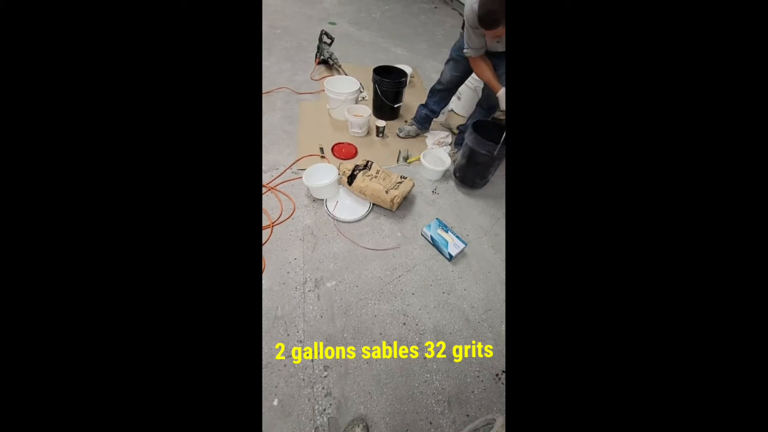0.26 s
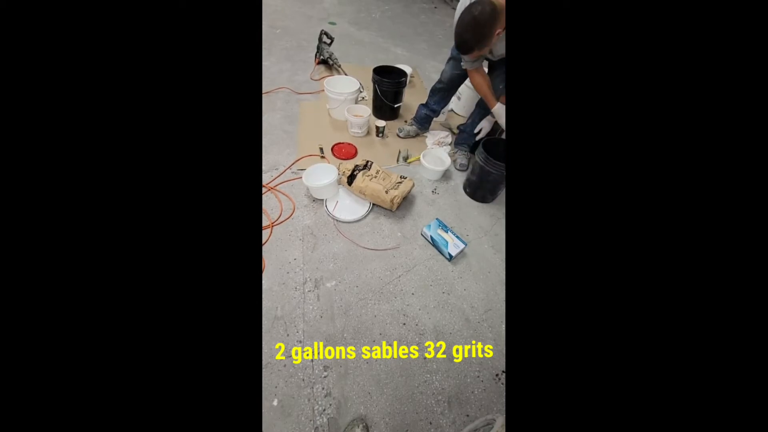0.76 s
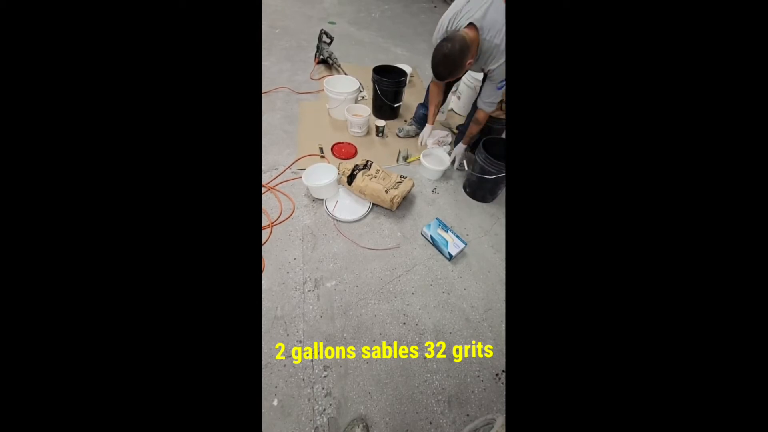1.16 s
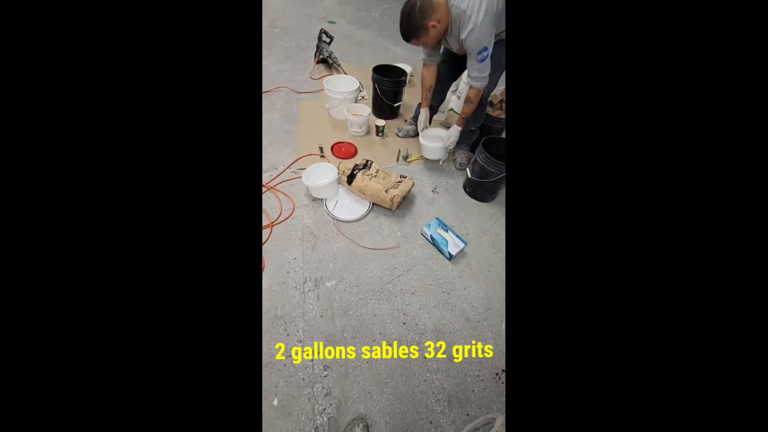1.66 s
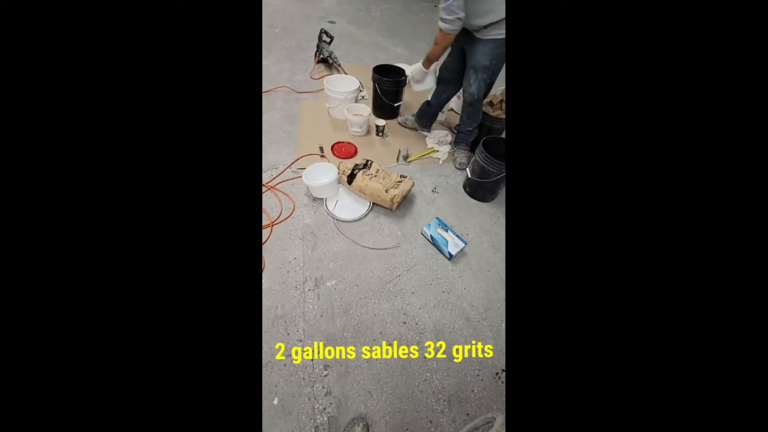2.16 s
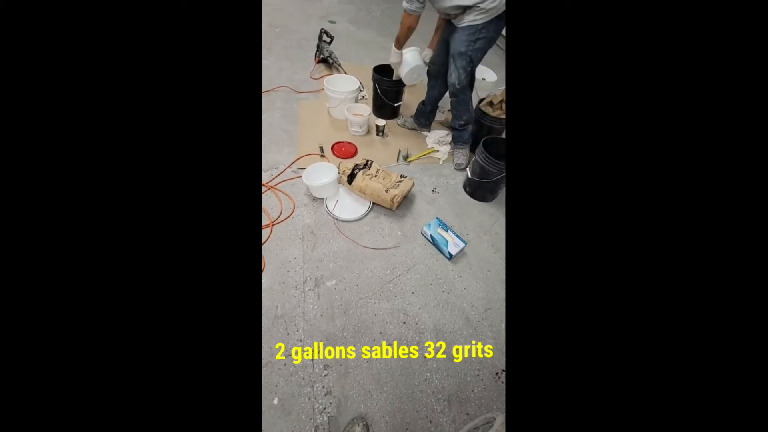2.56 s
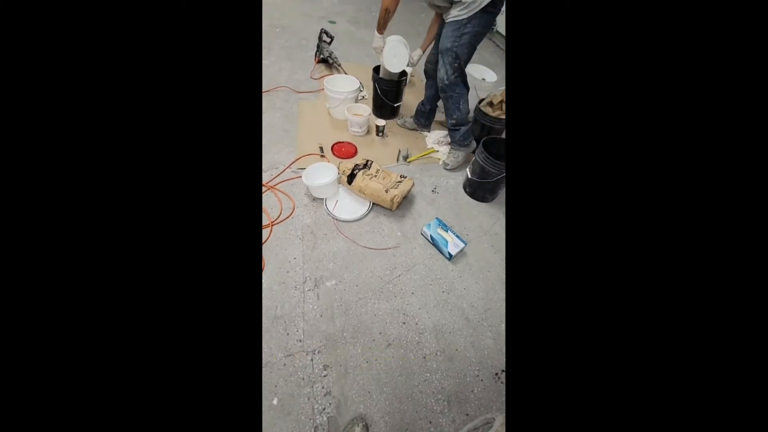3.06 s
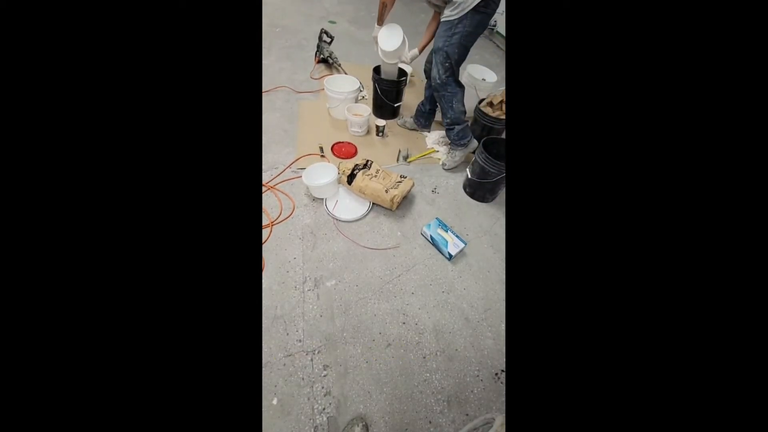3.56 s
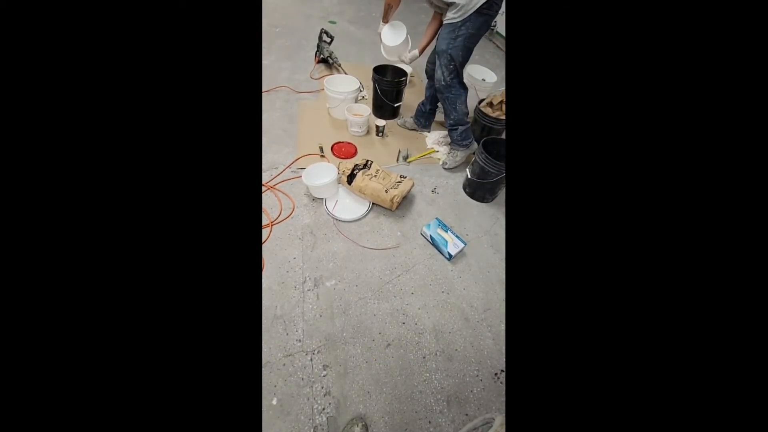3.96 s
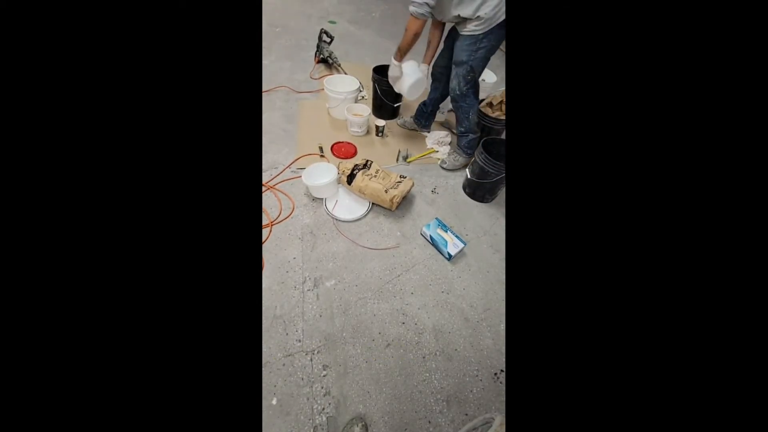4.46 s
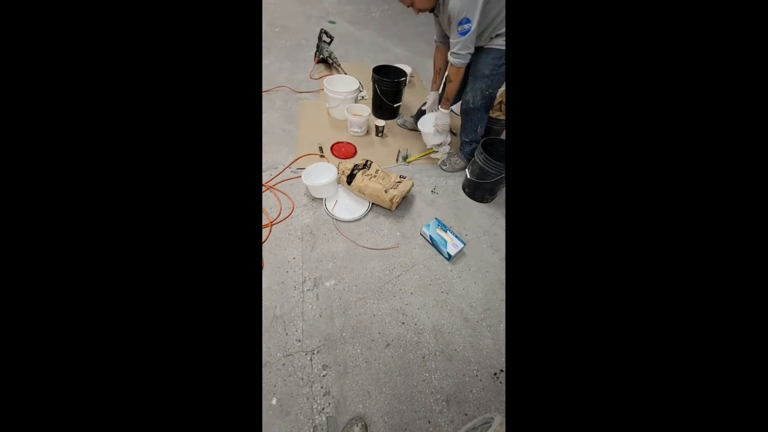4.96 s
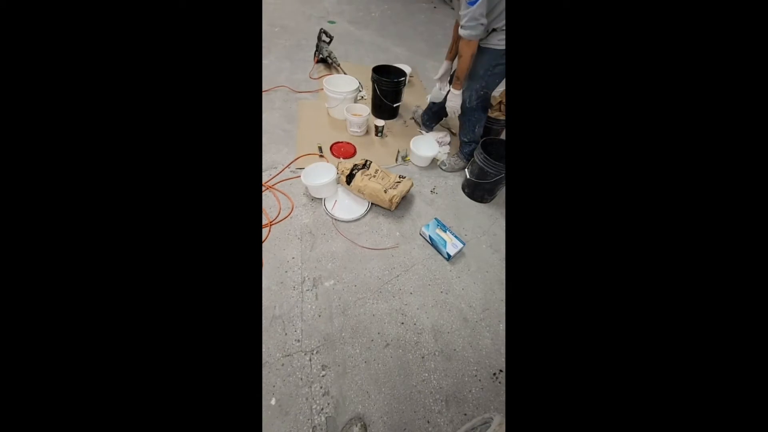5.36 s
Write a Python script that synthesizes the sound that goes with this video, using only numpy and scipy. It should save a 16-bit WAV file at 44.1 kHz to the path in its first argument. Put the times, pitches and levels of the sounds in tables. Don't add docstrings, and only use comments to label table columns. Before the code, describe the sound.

A full plastic bucket thumps down, its wire handle clacks, dry sand rushes into a deep bucket, then an empty pail bounces on concrete.

```python
import sys
import numpy as np
from scipy import signal
from scipy.fft import rfft, irfft
from scipy.io import wavfile
from scipy.ndimage import uniform_filter1d

SR = 44100
rng = np.random.default_rng(int(sys.argv[2]) if len(sys.argv) > 2 else 0)


def master(y):
    cut = np.clip(np.atleast_2d(y).T, -1, 1)
    pcm = np.round(cut * 32767)
    wavfile.write(sys.argv[1], SR, pcm.astype(np.int16))


def field_ratio(decibels):
    return 10 ** (np.asarray(decibels, dtype=float) / 20)


N = 247753

# (start [s], rise [s], length [s], flow level [dB], rush on the heap re flow [dB])
SAND_SLIDES = [
    (-.1, 0.3, 0.26, -52.5, -0.5),
    (1.9, 0.096, 0.19, -65, 2),
    (2.191, .08, 0.48, -72.5, 4.5),
    (2.495, 0.18, 0.44, -60.5, -6.5),
    (2.799, 0.079, 0.38, -48, 0),
    (3.15, .12, 0.77, -55.5, 2),
    (3.373, .13, 0.35, -49.5, 1.5),
    (3.897, 0.18, 0.27, -79.5, -0.5),
    (4.2, 0.14, 0.38, -90, 17.5),
]
# (start [s], rise [s], length [s], level [dB])
BARE_DRUMMING = [
    (2.6, 0.087, 0.16, -51.5),
    (2.78, 0.038, .07, -49.5),
    (2.86, 0.067, 0.11, -52),
    (3.4, 0.032, 0.064, -64),
    (3.78, 0.029, 0.036, -59),
]
# (start [s], rise [s], length [s], level [dB])
BUCKET_DRAGS = [
    (-.05, 0.094, .2, -62),
    (.14, 0.02, 0.067, -54.5),
    (4.0, 0.083, 0.15, -70),
    (4.7, 0.2, 0.29, -75.5),
]
# (frequency [Hz], density [dB per Hz])
FIZZ_SPECTRUM = [(3240, -32), (5500, -7), (6820, -8.5), (7900, -5), (10500, -6.5), (13300, 0.5),
                 (15200, -3), (16000, -19)]
# (frequency [Hz], density [dB per Hz])
RUSH_SPECTRUM = [(530, -51.5), (1000, -8.5), (1500, -9), (2000, -3), (3200, 1), (4500, -3.5), (5500, -10),
                 (7000, -9.5), (9100, -63.5)]
# (frequency [Hz], density [dB per Hz])
SCRAPE_SPECTRUM = [(600, -34), (1000, -4), (1500, 1), (2100, -7), (3200, -34.5)]
# (frequency [Hz], width [Hz], level [dB])
BUCKET_AIR = [(725, 80, 1.5), (620, 500, -19), (1280, 200, -15)]

# (time [s], blow [dB], crack re blow [dB], contact softness [ms], direct ring re blow [dB])
BUCKET_KNOCKS = [
    (.564, -8, -14.5, 0.11, -6),
    (.62, -11, -36, 0.2, -11),
    (.675, -22.5, -36, 0.43, 11),
    (.722, -20.5, -21.5, 0.13, -4),
    (.808, -17.5, -27.5, 0.051, -11),
]
HANDLE_KNOCKS = [
    (.72, -37, 11, 0.022, -6),
    (.8235, -19, 8.5, 0.067, -1),
    (1.1412, -6.5, 8.5, 0.0059, -2),
    (1.4275, -12.5, 8, 0.011, -2),
    (1.5945, -20.5, 5.5, 0.054, -19),
    (1.68, -24, 1, 0.13, -8),
    (1.7215, -37, -11, 0.076, -11),
]
PAIL_KNOCKS = [
    (5.163, -14.5, 11, 0.03, -9),
    (5.255, -11.5, -27, 0.067, -2.5),
    (5.329, -36.5, 0, 0.069, 13),
    (5.384, -28, 2, 0.17, 4),
    (5.445, -30.5, -5, 0.13, -5),
    (5.525, -36, -8, 0.18, -11),
]
RIM_KNOCKS = [
    (2.589, -54.5, -16, 0.042, 8),
    (2.751, -59, -15, 0.025, 15),
    (5.131, -34, -18, 0.044, -23),
    (5.142, -19, -17.5, 0.053, -13),
    (5.152, -17.5, -1.5, 0.017, 0.5),
]
FLOOR_THUDS = [
    (0.17, -25, -34, 0.024, -17),
    (0.813, -16, -7, 0.39, 4.5),
    (2.274, -35, -11, 0.11, -2),
]
GRIT_TICKS = [
    (1.9334, -46, 11, 0.046, 6),
    (2.8216, -40.5, -6, .08, 2),
    (4.049, -55, 12, .03, 2.3),
    (4.0694, -56, 16, 0.019, 2.2),
    (4.165, -48.5, 12.5, 0.045, 4),
    (4.2222, -47, 6.5, 0.022, 4),
    (4.344, -44.5, 1, 0.049, 2),
    (4.6682, -68, -7.5, 0.028, 3),
]
# (frequency [Hz], level [dB], decay time t60 [s])
BUCKET_MODES = [(112, -11.5, 0.055), (199.6, -4.5, 0.13), (245.8, -1, .11), (306.6, -6, 0.086),
                (429.4, -1.5, 0.018), (617, -3.5, 0.015), (780, -4, 0.013), (1093, -3.5, 0.027),
                (1490, -4, 0.0084), (2080, -8.5, 0.004)]
HANDLE_MODES = [(171, -16, 0.019), (245, -21, 0.053), (397, -9, 0.0097), (621, -5.5, 0.0079),
                (1025, -5.5, 0.013), (1293, -2, 0.0096), (2010, 3.5, 0.0019), (2560, -5, 0.0084),
                (2930, -2, 0.011), (2935, -7, 0.019), (2970, -15, 0.014)]
PAIL_MODES = [(109.5, -6.5, 0.091), (202, -7.5, 0.037), (348.8, 1, 0.085), (507.3, -2, 0.13),
              (574, -1.5, 0.091), (735, 4.5, 0.023), (1098, 7, 0.0093), (1755, 1, 0.0096),
              (2300, -16, 0.0057)]
RIM_MODES = [(577, -10.5, 0.019), (1150, -8, 0.022), (2140, 1, 0.0054), (3420, -4.5, 0.0028)]
FLOOR_MODES = [(85, -12, 0.17), (213.4, 4, 0.017), (367, -1.5, 0.04), (573, 1.5, 0.016), (1190, -7, 0.0088),
               (2128, -8, .006)]
GRIT_MODES = [(754, -44, .02), (1274, -8, 0.082), (2510, -8, .004), (3640, 11.5, 0.0039),
              (4260, 7.5, 0.0022)]
# (frequency [Hz], density [dB per Hz])
PLASTIC_CRACK = [(880, -31.5), (1500, -2.5), (2210, -6), (2660, -5.5), (2940, -9.5), (6180, -8),
                 (9850, -21), (12600, -13), (15500, -25), (16000, -67)]
# (frequency [Hz], density [dB per Hz])
WIRE_SNAP = [(2300, -23), (2950, -0.5), (3600, -11), (6470, -15), (11600, -19), (13200, -12),
             (15200, -23.5), (16000, -53.5)]

# (time [s], peak [dB], frequency [Hz], swell [ms])
WIRE_REFLECTIONS = [
    (0.8238, -22.5, 3050, .9),
    (0.8317, -22.5, 2764, 1.2),
    (1.1538, -8, 2935, 1.6),
    (1.164, -13.5, 2930, 2.3),
    (1.442, -34.5, 3010, 3.4),
    (1.451, -21.5, 3000, 2.4),
]
# (time [s], peak [dB], frequency [Hz], swell [ms])
FLOOR_FLEXES = [
    (.566, -9, 225.3, 13.7),
    (.814, -17.5, 227.6, 11),
    (2.8215, -39.5, 766, 2.8),
    (5.16, -29, 198, 14),
    (5.163, -24, 361.6, 10.5),
    (5.2552, -21.5, 650, 3.9),
]

# (start [s], rise [s], length [s], level [dB])
SHUFFLES = [
    (-.05, 0.063, 0.78, -56.5),
    (.15, 0.044, 0.082, -41),
    (2.2, 0.058, 0.18, -49),
    (2.4, 0.026, 0.31, -69),
    (4.0, 0.14, 0.13, -69),
    (4.64, 0.11, 0.21, -55),
    (4.8, 0.15, .35, -57),
]
# (frequency [Hz], density [dB per Hz])
CLOTH_SPECTRUM = [(150, -14), (250, 3.5), (265, -15.5), (362, -8), (694, -10), (1360, -20.5), (1580, -62),
                  (4000, -69), (5200, -73), (8800, -120)]
# (frequency [Hz], density [dB per Hz])
AIR_SPECTRUM = [(12, -20.5), (25, -8.5), (80, 4.5), (120, -8.5), (187, -9), (300, -10.5), (410, -12.5),
                (1480, -30), (2990, -31.5), (7000, -41), (10500, -49), (13900, -39), (16000, -65)]
# (frequency [Hz], rms level [dB])
LAMP_HUM = [(118.4, -62.5), (242.2, -60), (360.7, -68.5), (479.1, -75), (608.3, -85)]

# (frequency [Hz], decay time t60 [s])
REVERBERATION = [(100, 0.8), (260, 1.27), (700, 1.293), (1840, 1.065), (4850, 0.85), (12800, 0.35)]
# (delay [ms], left level [dB], right level [dB])
REFLECTIONS = [(3.084, -2.5, 3), (11.615, 8, -9.5), (14.13, -18, 6), (17.79, 4, 2.5), (23.75, -13, 3.5),
               (28.88, 0.5, -7)]
# (frequency [Hz], coherence [0..1])
COHERENCE = [(25, .93), (60, 0.45), (130, 0.96), (290, .85), (640, 0.63), (1400, 0.2), (3000, 0.11),
             (7000, 0.047), (15000, .02)]
# (frequency [Hz], level [dB])
LEFT_RESPONSE = [(60, 0.5), (150, -3), (380, -4.5), (950, -0.5), (2380, -0.5), (5980, -1.5), (15000, -2)]
RIGHT_LAG_MS = 0.39


def sand():
    grains_per_s = 9000
    clumps = field_ratio(0.6 * evened(uniform_filter1d(rng.standard_normal(N), 1500)))
    size = field_ratio(2.5 * np.minimum(rng.exponential(1, N), 5)) * rng.choice([-1, 1], N)
    clicks = evened(size * clumps * (rng.random(N) < grains_per_s / SR))

    hz = np.fft.rfftfreq(N, 1 / SR)
    cavity = sum(field_ratio(db) / (1 + (2 * (hz - f) / width) ** 2) for f, width, db in BUCKET_AIR)
    boom = evened(irfft(rfft(clicks * clumps ** 3) * cavity, N))
    boom = boom * swells(BARE_DRUMMING, sag_db=20, stop_db=84)

    flow = [row[:-1] for row in SAND_SLIDES]
    heap = [(s, rise, length, db + rush_db) for s, rise, length, db, rush_db in SAND_SLIDES]
    fizz = coloured(clicks, FIZZ_SPECTRUM) * swells(flow, sag_db=20, stop_db=150)
    rush = coloured(clicks, RUSH_SPECTRUM) * swells(heap, sag_db=19.5, stop_db=150)
    scrape = coloured(clicks, SCRAPE_SPECTRUM) * swells(BUCKET_DRAGS, sag_db=12, stop_db=72)
    pour = fizz + boom + rush + scrape
    return pour * field_ratio([[-7], [-6]]) + room(pour, tail_db=-1.0, echo_db=-12.5)


def bucket():
    return knocks(BUCKET_KNOCKS, BUCKET_MODES, PLASTIC_CRACK, crack_ms=2.4, small_hz=109,
                  tail_db=0.0, echo_db=-10.5, sent_db=2.5, pan_db=-2.5)


def handle():
    return knocks(HANDLE_KNOCKS, HANDLE_MODES, WIRE_SNAP, crack_ms=1.0, small_hz=123,
                  tail_db=7.5, echo_db=-5.5, sent_db=-5, pan_db=-0.5)


def wire_reflections():
    late = room(pulses(WIRE_REFLECTIONS, pan_db=-0.5)[0], tail_db=-3, echo_db=-24)
    return pulses(WIRE_REFLECTIONS, pan_db=-5) + late


def pail():
    return knocks(PAIL_KNOCKS, PAIL_MODES, PLASTIC_CRACK, crack_ms=2.2, small_hz=83,
                  tail_db=3, echo_db=-11.5, sent_db=7.5, pan_db=-5.0)


def rim():
    return knocks(RIM_KNOCKS, RIM_MODES, PLASTIC_CRACK, crack_ms=3.03, small_hz=400,
                  tail_db=1.0, echo_db=-3.5, sent_db=14.0, pan_db=0.0)


def floor():
    return knocks(FLOOR_THUDS, FLOOR_MODES, PLASTIC_CRACK, crack_ms=16.0, small_hz=60,
                  tail_db=0.5, echo_db=-8, sent_db=-2, pan_db=-6.0)


def grit():
    return knocks(GRIT_TICKS, GRIT_MODES, WIRE_SNAP, crack_ms=0.74, small_hz=500,
                  tail_db=0.5, echo_db=-7.0, sent_db=-6, pan_db=-2.5)


def flexes():
    return pulses(FLOOR_FLEXES, pan_db=-3.0)


def shuffle():
    lumps = field_ratio(1.5 * evened(uniform_filter1d(rng.standard_normal(N), 1200)))
    rubbing = coloured(diffuse(rng.standard_normal((2, N))) * lumps, CLOTH_SPECTRUM)
    return rubbing * swells(SHUFFLES, sag_db=12, stop_db=72)


def air():
    t = np.arange(N) / SR
    drift = field_ratio(0.4 * evened(uniform_filter1d(rng.standard_normal(N), 6000)))
    rumble = field_ratio(-54.5) * drift * coloured(diffuse(rng.standard_normal((2, N))), AIR_SPECTRUM)
    hum = np.zeros(N)
    for hz, db in LAMP_HUM:
        harmonic_hz = 120 * round(hz / 120)
        hum += np.sqrt(2) * field_ratio(db) * np.sin(2 * np.pi * (harmonic_hz * t + rng.random()))
    return rumble + hum


def knocks(events, modes, edge, crack_ms, small_hz, tail_db, echo_db, sent_db, pan_db):
    t = np.arange(8192) / SR
    short_t = t[:1024]
    push, direct, crack, sent = np.zeros((4, N + 1024))
    for s, db, crack_db, soft_ms, direct_db in events:
        at = slice(round(s * SR), round(s * SR) + 1024)
        contact = np.exp(-1000 * short_t / soft_ms)
        contact /= contact.sum()
        push[at] += field_ratio(db) * contact
        direct[at] += field_ratio(db + direct_db) * contact

        burst = rfft(rng.standard_normal(1024) * np.exp(-1000 * short_t / crack_ms))
        even_burst = irfft(burst / uniform_filter1d(abs(burst), size=5))
        crack[at] += field_ratio(db + crack_db) * even_burst * np.exp(-200 * short_t / crack_ms)
        sent[at] += field_ratio(db + crack_db + sent_db) * irfft(burst / abs(burst))

    body = np.zeros(len(t))
    for k, (hz, db, t60) in enumerate(modes):
        body += (-1) ** k * field_ratio(db - 60 * t / t60) * np.sin(2 * np.pi * hz * t)
    body = signal.sosfilt(signal.butter(3, small_hz, "high", fs=SR, output="sos"), body)
    body /= abs(body).max()

    ring, near = signal.oaconvolve([push, direct], body[None], axes=1)[:, :N]
    crack, sent = coloured(np.array([crack, sent])[:, :N], edge)
    left = near + crack
    right = np.roll(left, round(RIGHT_LAG_MS * SR / 1000))
    sides = np.array([left, right]) * field_ratio([[pan_db / 2], [-pan_db / 2]])
    return sides + room(ring + sent, tail_db, echo_db)


def pulses(rows, pan_db):
    out, t = np.zeros(N), np.arange(4096) / SR
    for s, db, hz, swell_ms in rows:
        u = 1000 * t / swell_ms
        out[round(s * SR):][:4096] += field_ratio(db) * u * np.exp(1 - u) * np.sin(2 * np.pi * hz * t)
    return np.array([out, np.roll(out, 14)]) * field_ratio([[pan_db / 2], [-pan_db / 2]])


def swells(rows, sag_db, stop_db):
    t = np.arange(N) / SR
    power = np.zeros(N)
    for s, rise, length, db in rows:
        below_db = 11.5 * np.maximum(1 - (t - s) / rise, 0)
        sagged_db = sag_db * np.maximum(t - s - rise, 0)
        stopped_db = stop_db * np.maximum(t - s - length, 0)
        power += field_ratio(2 * (db - below_db - sagged_db - stopped_db))
    return np.sqrt(power)


def room(x, tail_db, echo_db):
    length = 64000
    taps = np.zeros((2, length))
    at = np.arange(0, length, 20) + rng.integers(0, 20, (2, length // 20))
    np.put_along_axis(taps, at, rng.choice([-1., 1.], at.shape), 1)
    hz, t, z = signal.stft(diffuse(taps), SR, nperseg=512)
    decay = field_ratio(-60 * t / read(REVERBERATION, hz)[:, None])
    tail = signal.istft(z * decay, SR, nperseg=512)[1]
    tail *= np.clip((np.arange(tail.shape[1]) / SR - 0.006) / 0.0017, 0, 1)
    tail *= field_ratio(tail_db) / np.linalg.norm(tail[0])
    for ms, *sides_db in REFLECTIONS:
        arrival = round(ms * SR / 1000) + rng.integers(0, 12, 2)
        tail[[0, 1], arrival] += field_ratio(echo_db + np.array(sides_db))
    return signal.oaconvolve(x[None], tail, axes=1)[:, :N]


def diffuse(pair):
    a, b = rfft(pair)
    hz = np.fft.rfftfreq(pair.shape[1], 1 / SR)
    same = np.clip(read(COHERENCE, hz), -1, 1)
    late = np.exp(-2j * np.pi * hz * RIGHT_LAG_MS / 1000)
    return irfft(np.array([a, same * late * a + np.sqrt(1 - same ** 2) * b]), pair.shape[1])


def coloured(x, points):
    gain = field_ratio(read(points, np.fft.rfftfreq(x.shape[-1], 1 / SR)))
    return irfft(rfft(x) * evened(gain), x.shape[-1])


def evened(x):
    return x / np.sqrt(np.mean(x ** 2) + 1e-30)


def read(points, hz):
    f, value = np.transpose(points)
    return np.interp(np.log(hz + 1), np.log(f + 1), value)


def scene():
    pouring = sand()
    impacts = bucket() + handle() + wire_reflections() + pail() + rim() + floor() + grit() + flexes()
    return pouring + impacts + shuffle() + air()


def band_limit(x):
    return signal.sosfilt(signal.butter(12, 16650, fs=SR, output="sos"), x)


def record(dry):
    mono_hz, draught_hz = 120, 40
    edge_hz, ceiling = 15800, 0.97
    hz = np.fft.rfftfreq(N, 1 / SR)
    both = rfft(dry)
    both = both + (both.mean(0) - both) / (1 + (hz / mono_hz) ** 4 + (draught_hz / (hz + 1)) ** 4)
    half_db = read(LEFT_RESPONSE, hz) / 2
    ports = irfft(both * field_ratio([half_db, -half_db]), N)
    lowpass = signal.firwin(511, edge_hz, window=("kaiser", 9), fs=SR)
    limited = signal.oaconvolve(ports, lowpass[None], "same")
    mix = limited / np.sqrt(np.sqrt(1 + (limited / ceiling) ** 4))
    return band_limit(mix)


dry = scene()
out = record(dry)
master(out)
```